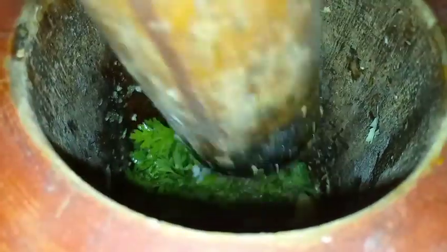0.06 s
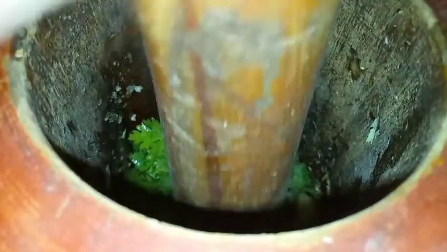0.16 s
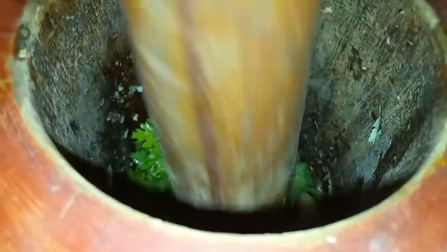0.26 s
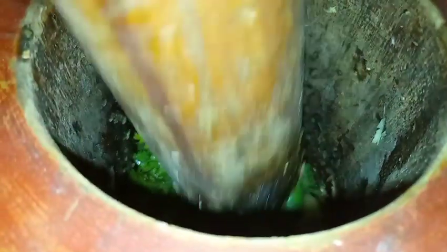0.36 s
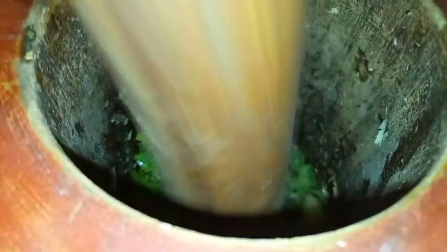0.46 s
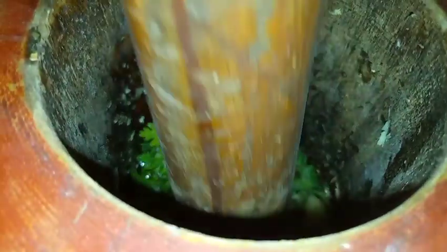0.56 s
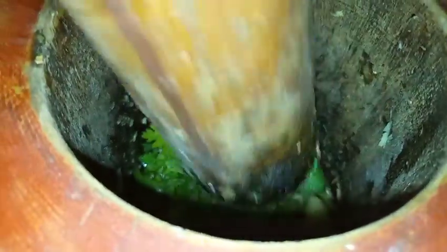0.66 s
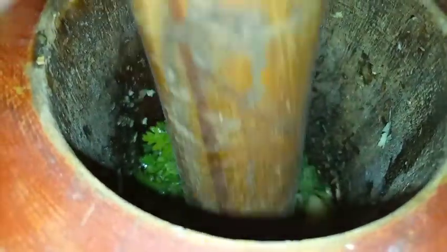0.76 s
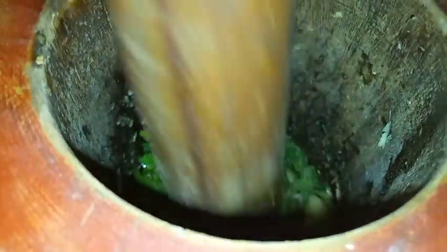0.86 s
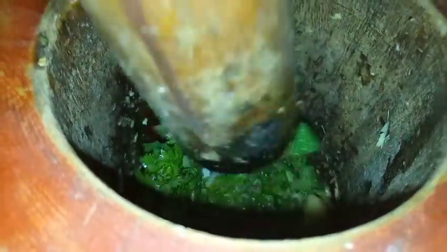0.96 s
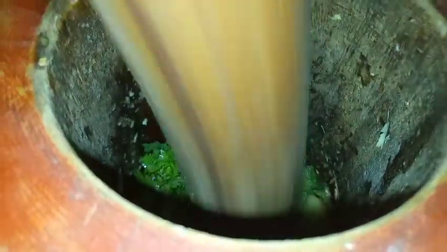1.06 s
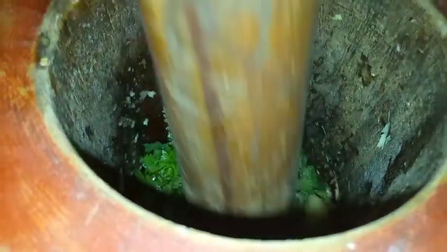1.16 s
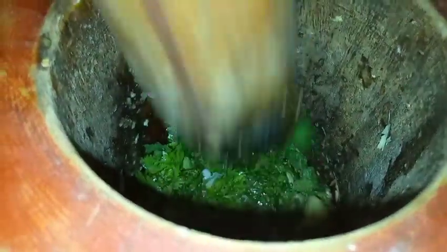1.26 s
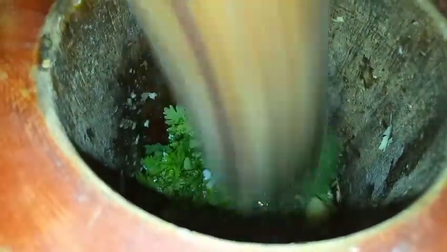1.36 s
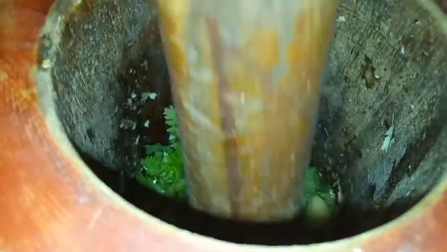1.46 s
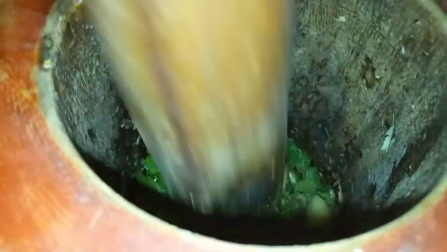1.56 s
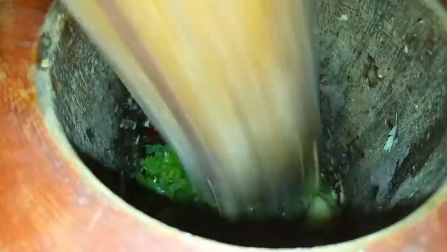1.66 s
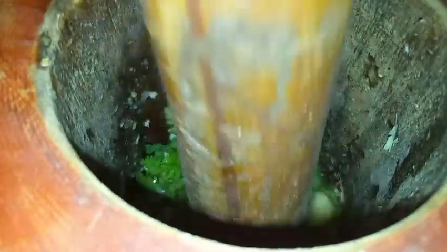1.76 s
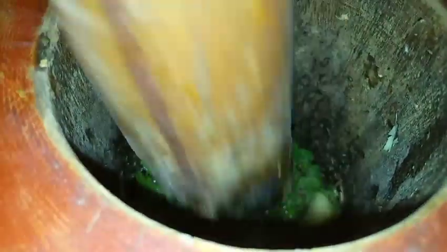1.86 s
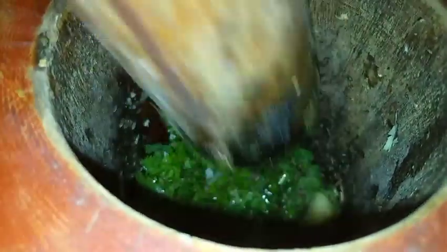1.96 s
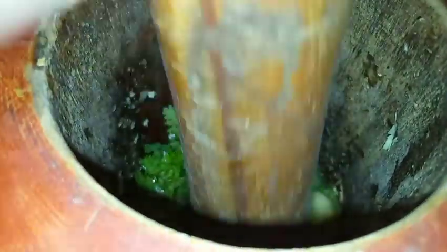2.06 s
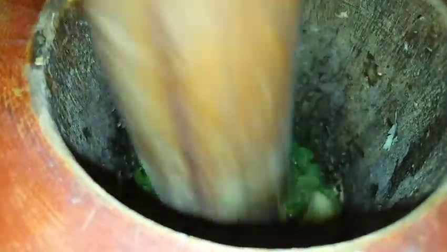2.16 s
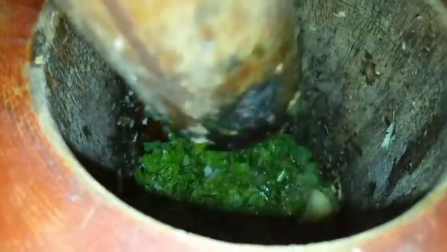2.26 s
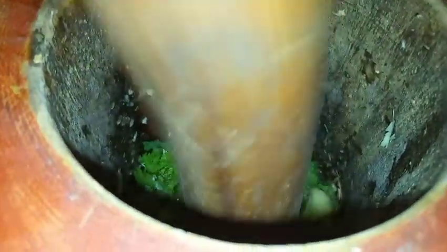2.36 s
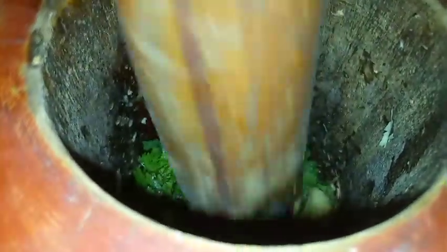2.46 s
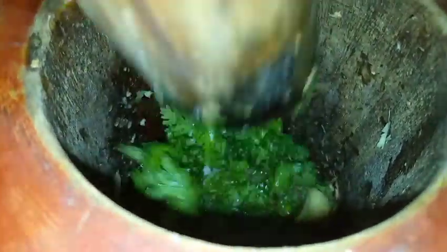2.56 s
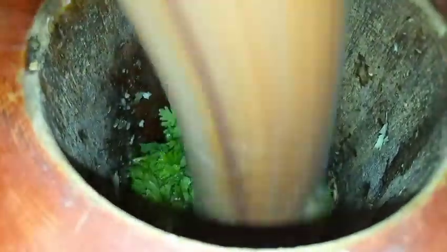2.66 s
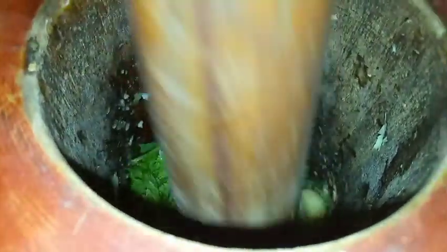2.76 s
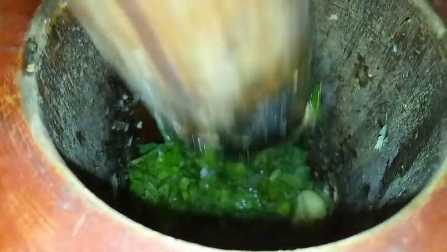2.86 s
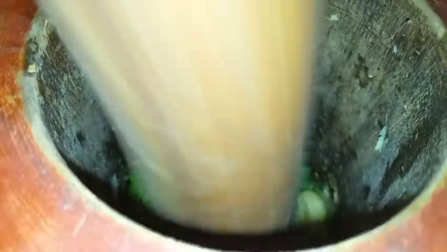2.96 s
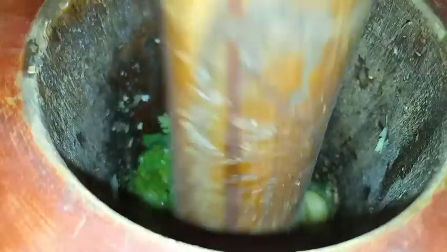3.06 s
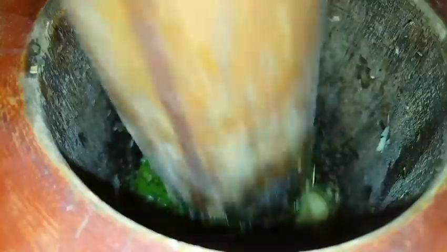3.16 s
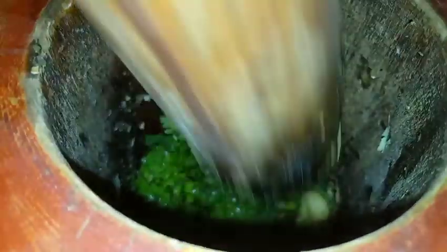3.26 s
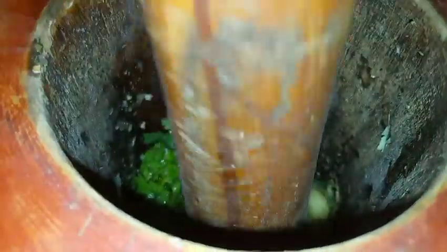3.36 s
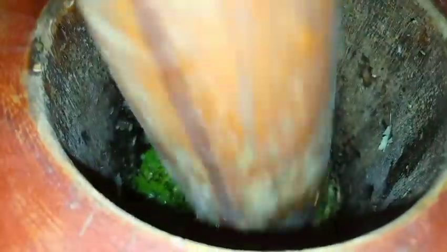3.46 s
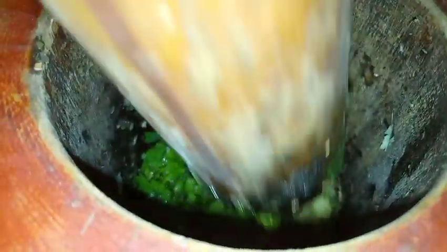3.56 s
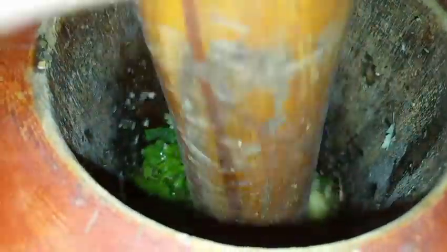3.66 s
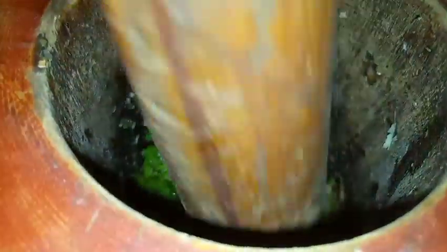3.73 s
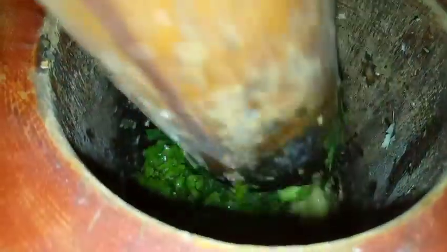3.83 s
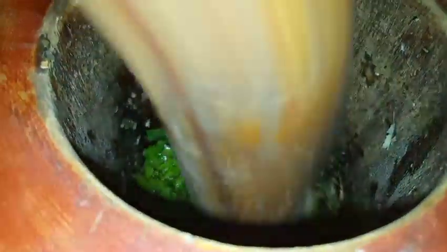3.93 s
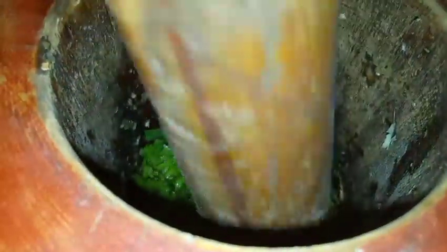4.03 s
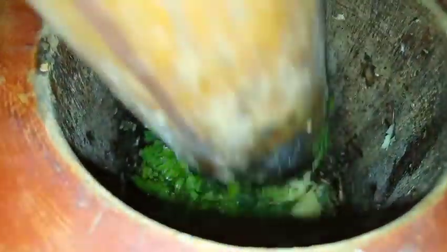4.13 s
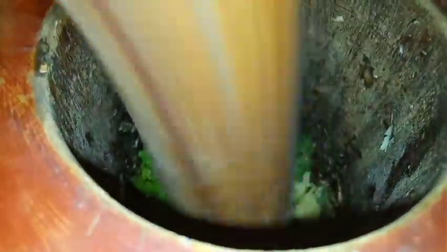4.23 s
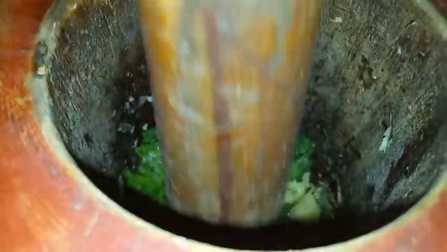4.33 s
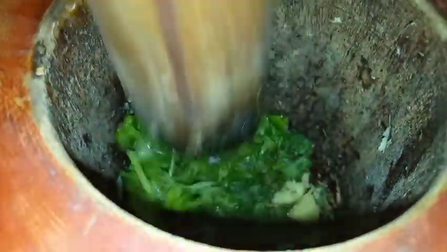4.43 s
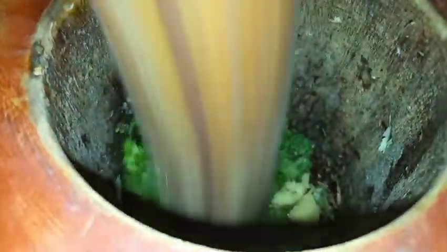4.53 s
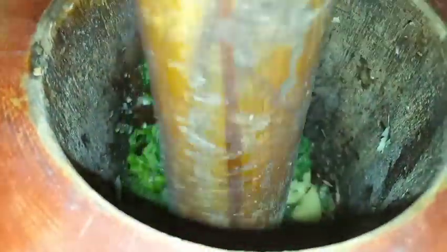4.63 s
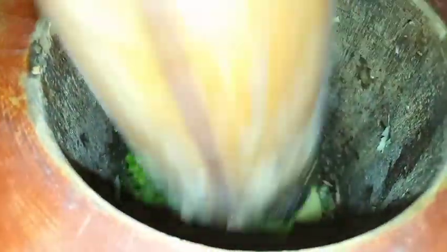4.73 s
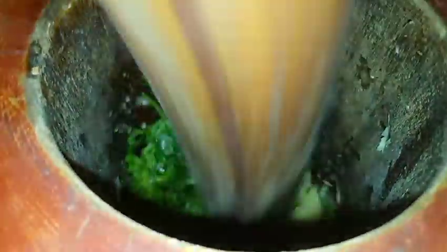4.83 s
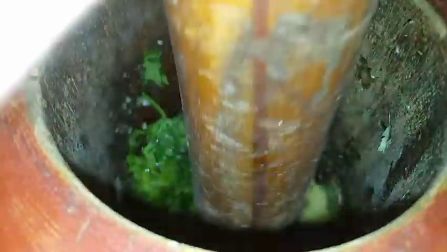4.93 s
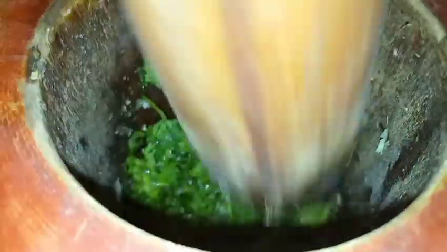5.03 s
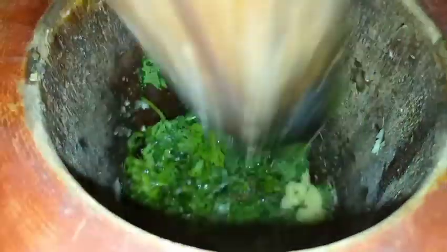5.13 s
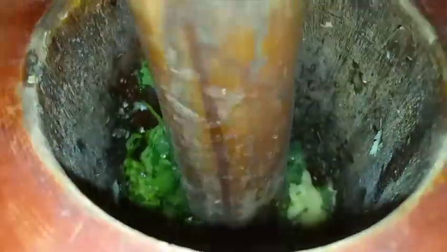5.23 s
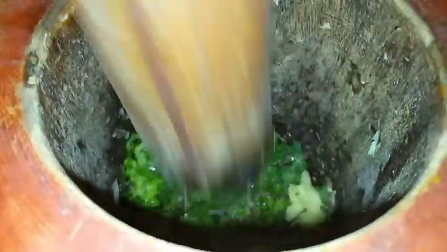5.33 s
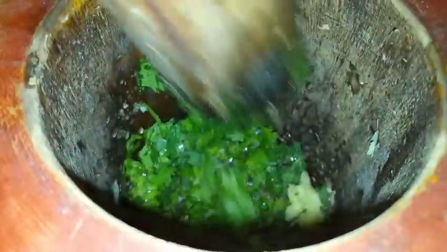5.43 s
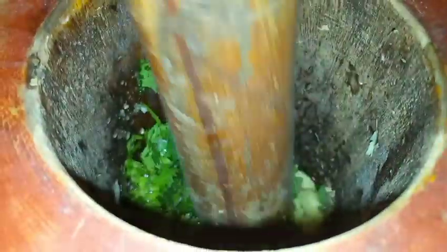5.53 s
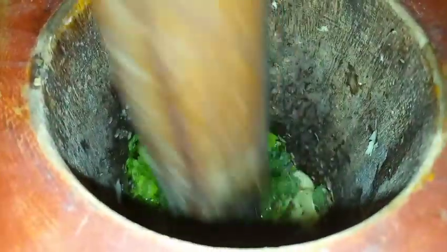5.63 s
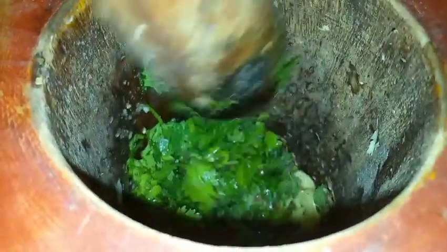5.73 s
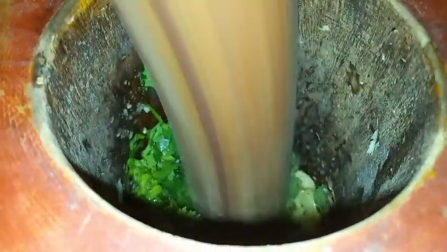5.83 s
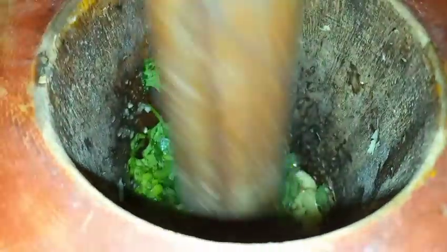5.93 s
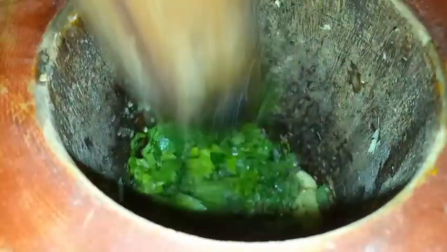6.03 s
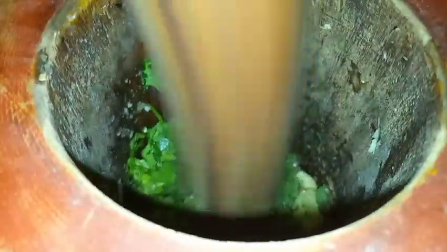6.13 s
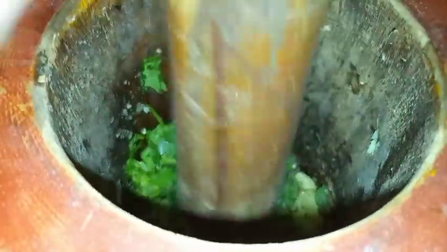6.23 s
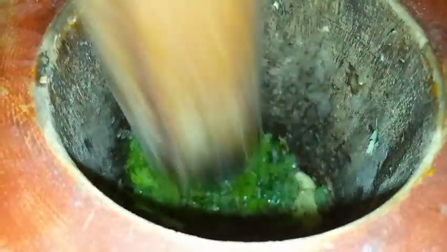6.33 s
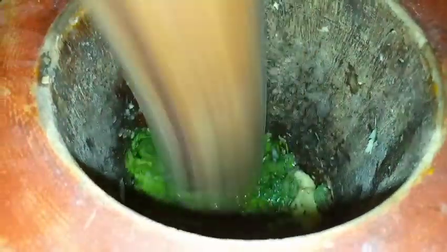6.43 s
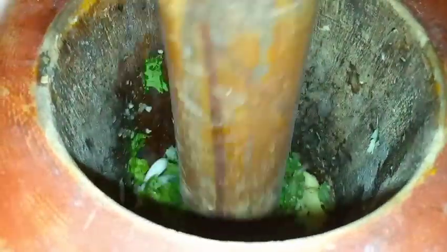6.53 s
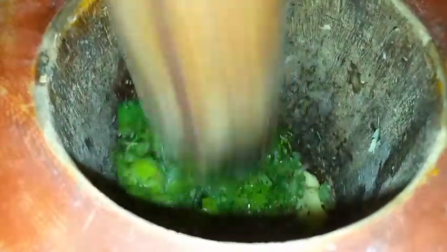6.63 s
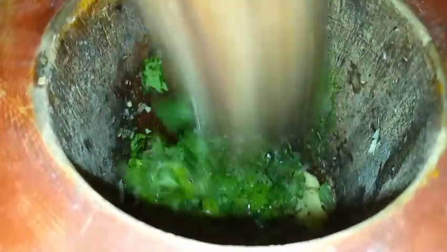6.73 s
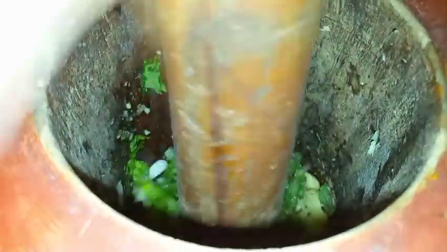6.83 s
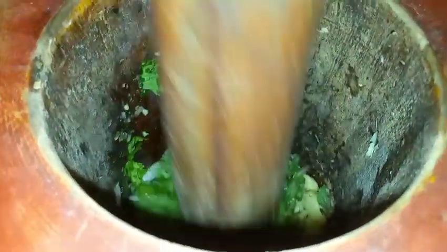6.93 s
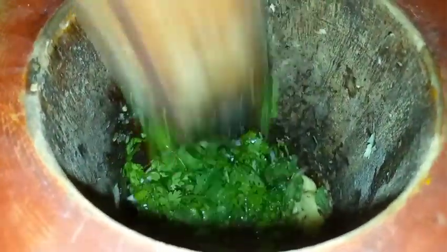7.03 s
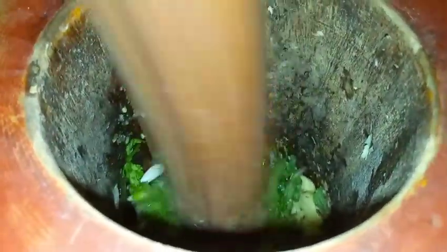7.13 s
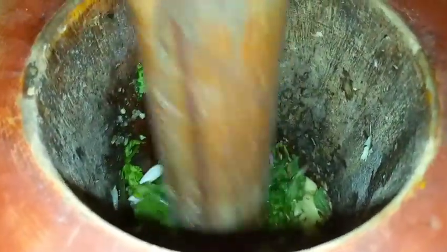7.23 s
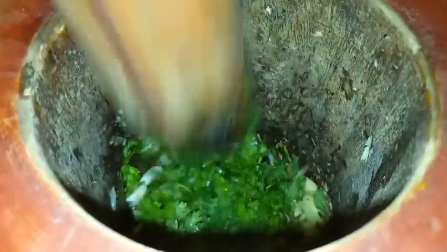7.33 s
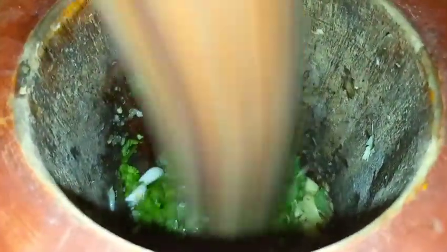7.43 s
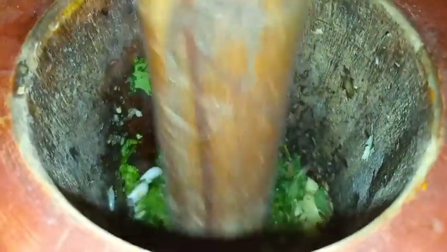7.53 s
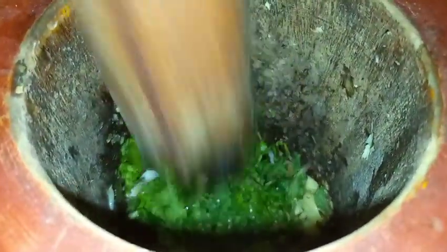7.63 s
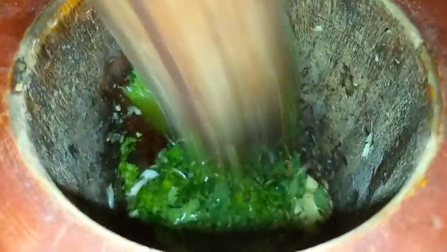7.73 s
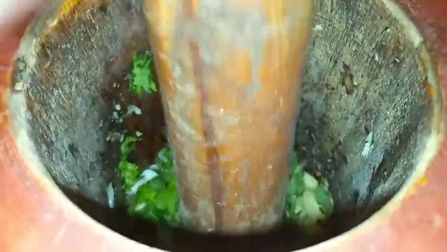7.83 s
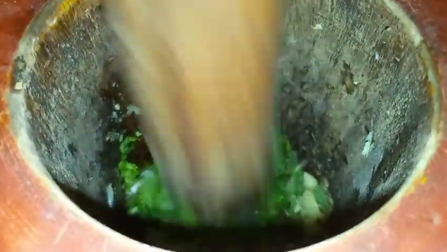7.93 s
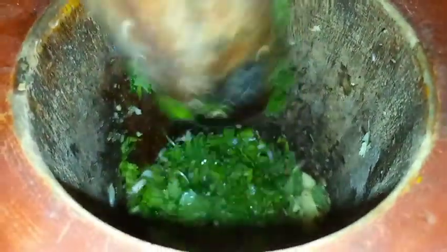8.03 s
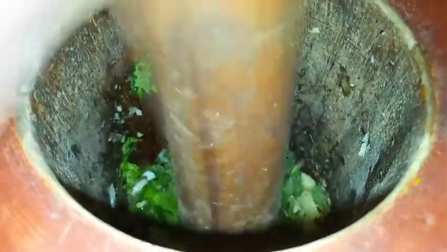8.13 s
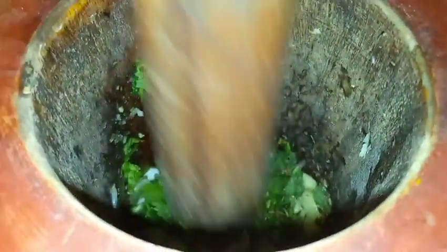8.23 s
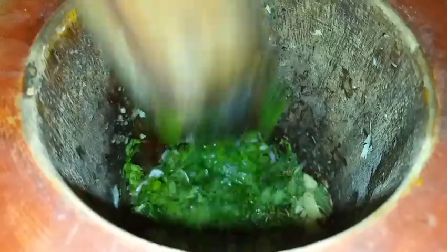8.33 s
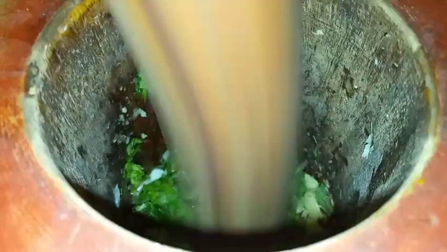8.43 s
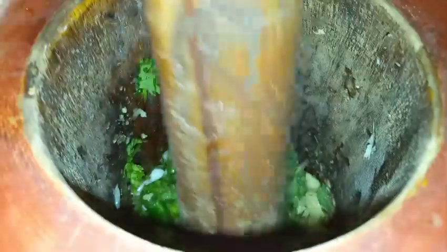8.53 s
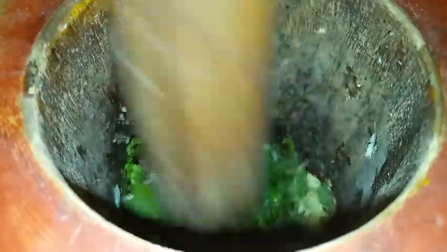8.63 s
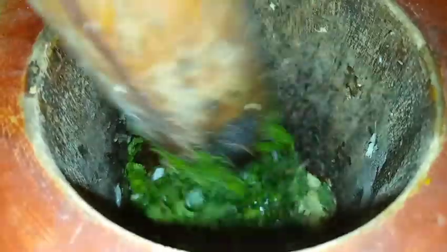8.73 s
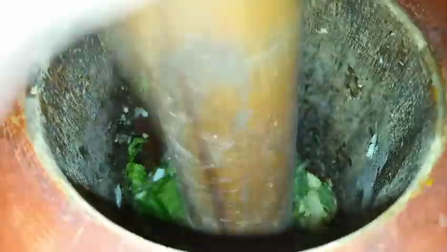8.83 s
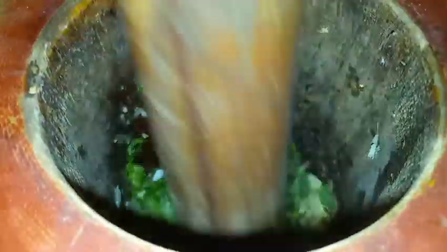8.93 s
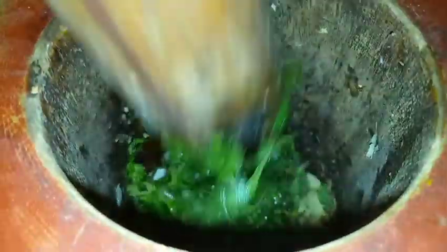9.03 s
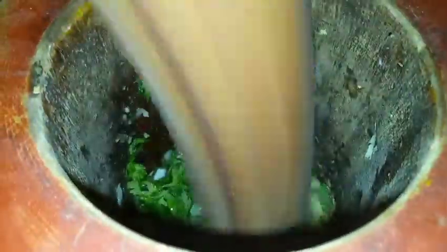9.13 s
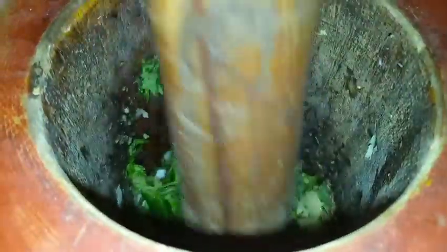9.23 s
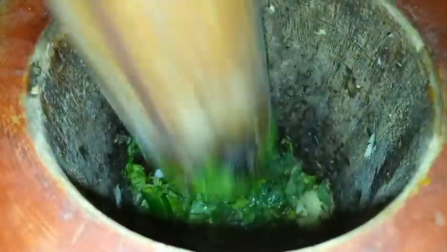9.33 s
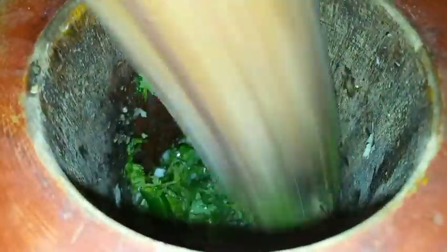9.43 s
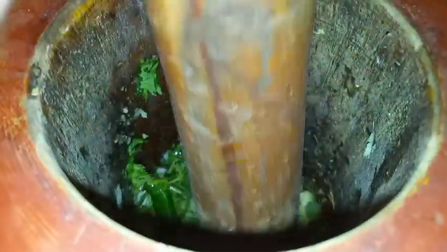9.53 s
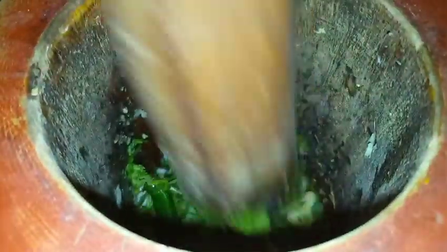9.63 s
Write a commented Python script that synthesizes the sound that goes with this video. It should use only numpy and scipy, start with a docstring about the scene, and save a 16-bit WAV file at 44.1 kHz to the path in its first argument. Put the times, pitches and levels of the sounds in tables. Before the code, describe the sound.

A wooden pestle pounds wet green herbs in a stone mortar about three times a second, each blow a crisp crunch over a low thud.

```python
"""A wooden pestle pounds herbs in a stone mortar about three times a second, in a small hard-walled kitchen.
Each blow sums a crunch (shaped noise), a thud and knock of mortar and worktop (low damped sines),
and a clack of wood on stone (higher damped sines) that weakens with the knock. Glances, taps, rebounds,
wet ticks and faint thin knocks fall around the blows; leaves rustle and a steady hiss fills the room.
One close microphone feeds both channels."""
import sys
import numpy as np
from scipy import signal
from scipy.fft import rfft, irfft, next_fast_len
from scipy.io import wavfile
from scipy.ndimage import uniform_filter1d, map_coordinates

SR = 44100
rng = np.random.default_rng(int(sys.argv[2]) if len(sys.argv) > 2 else 0)


def gain_from_decibels(decibels):
    """Convert decibel values to linear amplitude factors."""
    exponent = np.asarray(decibels, float) / 20
    return 10 ** exponent


def transcribe(signal):
    """Save signal, clipped to [-1, 1], as a 16-bit WAV file at the path in sys.argv[1]."""
    frames = np.atleast_2d(signal).T
    limited = np.clip(frames, -1, 1)
    pcm = np.round(limited * 32767).astype(np.int16)
    wavfile.write(sys.argv[1], SR, pcm)


N = 426888
LEAD = SR // 2  # run-up before time zero, also length of each event, samples

# full blows on the herbs: crunch_peak_s, thud_db, knock_db, crunch_db, tilt_db_per_octave, air_gap_hz
BLOWS = [(-0.113, -32.5, -40, -22.5, 0, 4500), (0.217, -32, -37.5, -24.5, -1, 4580),
         (0.5153, -35.5, -43, -25, -2, 5350), (0.8223, -33.5, -38, -25, -1.8, 4470),
         (1.1473, -35.5, -36.5, -23.5, 0.4, 4750), (1.4623, -32.5, -33, -23, -2, 5040),
         (1.7827, -38, -46.5, -27, -1.5, 3380), (2.1025, -32.5, -36.5, -23.5, -4.5, 3400),
         (2.4309, -33.5, -37, -25.5, -2.5, 4380), (2.7504, -37, -41, -23, -0.5, 3750),
         (3.0541, -44, -50, -24, -.6, 3450), (3.3742, -35, -36.5, -27, -2, 3000),
         (3.6945, -48.5, -46, -20.5, -2.5, 2980), (3.9937, -37, -45.5, -23.5, -4.5, 4600),
         (4.3071, -34.5, -34, -22.5, -4.5, 4660), (4.6241, -46.5, -60.5, -25.5, -1.3, 3000),
         (4.932, -38, -58.5, -25.5, -1.6, 3550), (5.256, -38.5, -52.5, -21.5, -2.2, 4320),
         (5.5755, -34.5, -43, -26, -0.5, 3440), (5.895, -33, -39, -23.5, -0.5, 4460),
         (6.2306, -33, -40.5, -24.5, -1.5, 3160), (6.5435, -43.5, -54.5, -23, -1.5, 5160),
         (6.8722, -32, -31.5, -23.5, -1.2, 3400), (7.2005, -33, -37.5, -24, -1, 3400),
         (7.528, -32.5, -31, -23.5, -1, 2560), (7.86, -33, -33, -23.5, -5.5, 2800),
         (8.199, -33, -33, -24.5, -8, 3500), (8.5359, -32, -29.5, -22, -7.5, 3000),
         (8.8727, -34, -37, -24.5, -2, 2900), (9.2102, -35, -38, -26.5, -3.5, 4000),
         (9.5407, -44, -47, -22.5, -4, 3030)]
# mortar, worktop and room ringing together: mode_hz, relative_db, t60_s
BODY_MODES = [(104, -37, .78), (116.8, -38.5, .89), (123, -41, 1.07), (136.6, -26.5, .32),
              (148.8, -30.5, .54), (158.4, -23, .42), (161.9, -15.5, .15), (167, -38, .6),
              (179.8, -47, .76), (183.8, -36.5, .61), (193.7, -32, .26), (215.2, -50.5, 1.2),
              (226.9, -29, .39), (228.2, -29, .24), (256, -38, .37), (263.5, -41, .81), (269.7, -46.5, .78),
              (274.6, -30.7, .52), (291, -37, .65), (306.7, -47.5, .46), (314, -54.5, 1.1),
              (331.7, -42, .48), (345, -36, .54)]
# first motion of each body mode at the microphone: sign (+1 push, -1 pull)
BODY_SIGNS = [-1, 1, 1, 1, 1, 1, -1, 1, -1, 1, 1, -1, 1, -1, 1, 1, -1, -1, -1, 1, -1, -1, -1]
# colour of crushed leaves: freq_hz, relative_db
CRUNCH_SPECTRUM = [(290, -45.5), (500, -18.5), (952, -30.5), (1980, -14), (3160, -4.5), (4490, -2),
                   (5590, -7), (6280, -1.5), (8670, -28), (10600, -15.5), (12300, -21), (15100, -17),
                   (16500, -48)]
# pestle and mortar wall: mode_hz, relative_db, t60_s
WOOD_MODES = [(343, -11, 0.35), (424.4, 2, 0.096), (472, -6, 0.15), (518.7, -1, 0.24), (555, -2, 0.072),
              (585.4, 3.5, 0.13), (703, -4, 0.02), (795, -6.5, 0.1), (880, 0.5, 0.032), (994, -5, 0.06),
              (1132.6, 1.5, 0.081), (1225, -2.5, 0.062), (1404, -9, 0.046), (1645, -2.5, 0.047),
              (1870, -4.5, 0.038), (2020, -14, 0.035), (2800, 7, 0.095), (3400, -32, 0.032),
              (4140, 14, 0.068)]
# pestle glancing off the wall on its way down: start_s, clack_db, favoured_hz, range_octaves, room_db
GLANCES = [(3.6946, -40, 600, 2.5, -18.5), (3.992, -32.5, 1070, 0.75, -17.5), (4.3064, -37.5, 740, 0.6, -8),
           (8.198, -44, 893, 0.83, 0), (8.5345, -30, 897, 0.69, -10), (9.5399, -51.5, 850, 0.77, -17)]
# light taps on the wall between blows: start_s, clack_db, favoured_hz, push_db, crackle_db
TAPS = [(6.103, -44, 1000, -56, -43), (7.384, -59, 1120, -70, -43), (7.702, -52.5, 1120, -75, -40.5),
        (8.361, -40, 1330, -49, -32)]
# tip settling just after a blow: peak_s, crunch_db
REBOUNDS = [(1.812, -41.2), (3.086, -40), (4.024, -36), (4.656, -44.5), (4.964, -39), (5.288, -39.5),
            (5.602, -37.5), (8.903, -34.5), (9.242, -43.5), (9.571, -35.5)]
# wet ticks and stems snapping: peak_s, crunch_db, spread_ms, tilt_db_per_octave
TICKS = [(3.141, -43, 1.8, 6.5), (3.217, -50, 4.7, -5), (4.496, -43, 1.9, 1.5), (5.088, -62.5, 1.5, 12),
         (6.12, -55, 3, -7), (6.339, -47, 11, -2.5), (6.521, -63, 2, -7), (8.179, -49.5, 5.8, -4)]
# thin knocks, perhaps from across the kitchen: start_s, clack_db, favoured_hz, room_db, thump_db
FAR_KNOCKS = [(5.03, -60, 1550, -33, -85), (5.468, -69, 1000, -24, -68), (5.553, -59, 1820, -6, -62),
              (5.746, -54.5, 1200, -2, -50.5)]
# ringing of the thin knocks: mode_hz, relative_db, t60_s
THIN_MODES = [(265, 3, .1), (445, -2, .1), (1065, -10, 0.065), (1744, -2.5, 0.079), (1960, -3, .05),
              (2430, -5, .06), (2900, -5, .07)]
# room decay: freq_hz, t60_s
KITCHEN_DECAY = [(300, 0.64), (1000, 0.36), (3000, 0.4), (8000, 0.22), (15000, 0.14)]
# level of the steady rustle: time_s, level_db
RUSTLE_LEVELS = [(0, -58), (1.9, -60.5), (3.1, -57), (4.2, -57), (5.2, -64.5), (6.0, -63), (7.0, -57),
                 (7.9, -75), (9.0, -75), (9.68, -67)]
# leaves peeling off the rising pestle: peak_s, level_db
PEELS = [(3.23, -54), (3.59, -56), (4.4, -51.5), (4.53, -62), (4.88, -57), (6.05, -59), (5.64, -46.5),
         (5.77, -54), (7.12, -54.5), (7.58, -52.5), (8.29, -46.5), (8.65, -48.5)]
# colour of the rustle: freq_hz, relative_db
RUSTLE_SPECTRUM = [(290, -44), (600, -26), (1000, -30), (1450, -25), (1950, -14), (2800, 0.5), (3500, -7),
                   (4490, 0.5), (6280, -5.5), (8670, -34), (10600, -15.5), (12300, -32), (15100, -29),
                   (16500, -77)]
# colour of the hiss: freq_hz, relative_db
HISS_SPECTRUM = [(35, -42), (60, -1.5), (137, -3), (276, -22.5), (375, -22.5), (700, -27.5), (1050, -23.5),
                 (1450, -30.5), (1750, -23), (2700, -17), (4430, -16.5), (6450, -19.5), (8540, -37),
                 (15000, -30), (16500, -41)]


def pestle():
    """All strokes of the pestle and the small sounds between them, summed on one track."""
    track = np.zeros(N + 3 * LEAD)
    thud, knock = body()
    blows(track, thud, knock)
    glances(track)
    taps(track, thud + knock)
    rebounds(track)
    ticks(track)
    far_knocks(track, thud + knock)
    return track[LEAD:][:N]


def blows(track, thud, knock):
    """Blows land on one spot, so the low ringing repeats; a thicker bed eats thud and draws out the crunch."""
    solid_thud_db, firm_knock_db = -33, -32.5  # reaches the bottom; meets bare stone
    thud_lead_s, clack_lead_s = .0014, .0007  # before the crunch peak
    firm_clack_db, clack_db_per_knock_db = -35.5, 1.314
    solid_spread_ms, spread_ms_per_db = 1.56, .2
    solid_room_db, room_db_per_db = -12.5, 0.42
    for peak_s, thud_db, knock_db, crunch_db, tilt_db, gap_hz in BLOWS:
        eaten_db = solid_thud_db - thud_db
        padded_db = firm_knock_db - knock_db
        add(track, peak_s - thud_lead_s, gain_from_decibels(thud_db) * thud + gain_from_decibels(knock_db) * knock)
        clack_db = firm_clack_db - clack_db_per_knock_db * padded_db
        strike = clack(centre_hz=610, octaves=0.69, room_db=-14.5)
        add(track, peak_s - clack_lead_s, gain_from_decibels(clack_db) * strike)
        spread_ms = solid_spread_ms + spread_ms_per_db * eaten_db
        room_db = solid_room_db - room_db_per_db * eaten_db
        crunch(track, peak_s, crunch_db, spread_ms, tilt_db, gap_hz, room_db)


def crunch(track, peak_s, db, spread_ms, tilt_db, peak_hz, room_db):
    """Leaves giving way, placed by the peak of the burst."""
    add(track, peak_s - .02, gain_from_decibels(db) * snap(spread_ms / 1000, tilt_db, peak_hz, room_db))


def snap(spread_s, tilt_db, peak_hz, room_db):
    """Leaves give way: a ragged burst swells, peaks at 20 ms and breaks off, then the room answers."""
    t = np.arange(LEAD) / SR - .02
    touch_per_ms, touch_spreads = .02, 3.1  # tip brushes the top leaves first: share of peak, rise time
    swell = np.exp(t / (0.67 * spread_s))
    touch = touch_per_ms * spread_s * 1000 * np.exp(t / (touch_spreads * spread_s))
    fall = 0.56 * np.exp(-t / (1.62 * spread_s)) + 0.033 * np.exp(-t / 0.038)
    shape = np.where(t < 0, swell + touch, fall)
    # the air gap under the pestle sings at its own pitch
    pocket_peak_db, pocket_half_width_hz, pocket_share_in_room = 6.5, 310, .4
    hz = np.geomspace(300, 16500, num=90)
    pocket_db = pocket_peak_db / (1 + ((hz - peak_hz) / pocket_half_width_hz) ** 2)
    colour_db = along(CRUNCH_SPECTRUM, hz) + pocket_db + rng.normal(0, 0.32, len(hz))
    room_colour_db = colour_db - (1 - pocket_share_in_room) * pocket_db
    noise = coloured(rng.standard_normal(LEAD), np.transpose([hz, colour_db]), tilt_db)
    burst = noise * unit(shape * flicker(LEAD, step=60.35, depth_db=3.0))
    echoes = kitchen(delay_s=0.015, patchy_db=2.5)
    tail = np.roll(coloured(echoes, np.transpose([hz, room_colour_db]), tilt_db), SR // 50)
    return (burst + gain_from_decibels(room_db) * tail) * np.sqrt(SR / 40 / LEAD)  # burst energy: rms 1 over 25 ms


def body():
    """Thud and knock: mortar, worktop and room modes below and above 205 Hz; the upper need firm contact."""
    hz, db, t60_s = np.transpose(BODY_MODES)
    split_hz = 205
    thud = ringing(hz, db, t60_s, np.multiply(BODY_SIGNS, hz < split_hz))
    knock = ringing(hz, db, t60_s, np.multiply(BODY_SIGNS, hz > split_hz))
    return thud, knock


def clack(centre_hz, octaves, room_db, modes=WOOD_MODES):
    """Wood on stone: the strike favours some modes; the room keeps their pitch over a wider, blurred wash."""
    hz, db, t60_s = np.transpose(modes)
    favour_db = -6 * (np.log2(hz / centre_hz) / octaves) ** 2
    varied_db = db + favour_db + rng.standard_normal(len(hz))
    ring = ringing(hz, varied_db, t60_s, np.ones(len(hz)))
    echoes = kitchen(delay_s=0.016, patchy_db=3.6)
    pitched = unit(signal.fftconvolve(ring, echoes)[:LEAD])
    wash = coloured(echoes, [(220, -45), *zip(hz, 0.42 * db + 0.42 * favour_db), (7000, -60)])
    return ring + gain_from_decibels(room_db) * (pitched + gain_from_decibels(0.5) * wash)


def ringing(hz, db, t60_s, weights):
    """Damped sines set off together, rms 1 over their first tenth of a second."""
    t = np.arange(LEAD)[:, None] / SR
    modes = np.sin(2 * np.pi * hz * t) * gain_from_decibels(db - 60 * t / t60_s)
    ring = modes @ weights
    return ring / np.std(ring[:SR // 10])


def glances(track):
    """The pestle strikes the wall as it comes down: clacks alone."""
    for start_s, db, centre_hz, octaves, room_db in GLANCES:
        add(track, start_s, gain_from_decibels(db) * clack(centre_hz, octaves, room_db))


def taps(track, push):
    """Light taps on the wall: a clack, a push into the mortar and a crackle peaking 2 ms later."""
    for start_s, db, centre_hz, push_db, crackle_db in TAPS:
        strike = clack(centre_hz, octaves=0.9, room_db=-20)
        add(track, start_s, gain_from_decibels(db) * strike + gain_from_decibels(push_db) * push)
        crunch(track, start_s + .002, crackle_db, spread_ms=2.2, tilt_db=-9.5, peak_hz=2963, room_db=-19)


def rebounds(track):
    """The tip settles once more into the leaves: a dull, slower crunch."""
    for peak_s, db in REBOUNDS:
        crunch(track, peak_s, db, spread_ms=4.3, tilt_db=-6.5, peak_hz=4200, room_db=-10)


def ticks(track):
    """Wet ticks and snapping stems: small crunches of varied length and brightness."""
    for peak_s, db, spread_ms, tilt_db in TICKS:
        crunch(track, peak_s, db, spread_ms, tilt_db, peak_hz=4460, room_db=-7)


def far_knocks(track, thump):
    """Thin knocks: a few short modes, room wash and a low thump."""
    for start_s, db, centre_hz, room_db, thump_db in FAR_KNOCKS:
        strike = clack(centre_hz, octaves=1.8, room_db=room_db, modes=THIN_MODES)
        add(track, start_s, gain_from_decibels(db) * strike + gain_from_decibels(thump_db) * thump)


def kitchen(delay_s, patchy_db):
    """The walls' answer to an impulse, rms 1: each frequency dies at its own speed, in uneven patches."""
    hz, t, z = signal.stft(rng.standard_normal(LEAD), SR, nperseg=256)
    patches = uniform_filter1d(rng.standard_normal(z.shape), size=4, axis=0)
    patches = uniform_filter1d(patches, size=9, axis=1)
    decay_db = -60 * t / along(KITCHEN_DECAY, hz)[:, None]
    gain = gain_from_decibels(patchy_db * unit(patches) + decay_db)
    tail = signal.istft(z * gain, SR, nperseg=256)[1][:LEAD]
    build_up = 1 - np.exp(-np.arange(LEAD) / SR / delay_s)
    return unit(tail * build_up)


def leaves():
    """A fine uneven rustle of filtered noise, swelling whenever leaves peel off the pestle."""
    t = np.arange(N) / SR
    noise = coloured(rng.standard_normal(N), RUSTLE_SPECTRUM)
    rustle = unit(flicker(N, step=870, depth_db=2.5) * noise)
    peels = np.zeros(N)
    for peak_s, db in PEELS:
        width_s = np.where(t < peak_s, .06, 0.095)  # rise, fall
        peels += gain_from_decibels(db) * np.exp(-((t - peak_s) / width_s) ** 2)
    steady = gain_from_decibels(np.interp(t, *np.transpose(RUSTLE_LEVELS)))
    return np.hypot(steady, peels) * rustle


def hiss():
    """Steady coloured noise filling the room."""
    return gain_from_decibels(-56.5) * coloured(rng.standard_normal(N), HISS_SPECTRUM)


def unit(x):
    """Scaled to rms 1."""
    return x / np.sqrt(np.mean(x ** 2) + 1e-20)


def along(points, hz):
    """(Hz, value) points interpolated on a log frequency axis."""
    f, v = np.transpose(points)
    return np.interp(np.log(hz + 1), np.log(f + 1), v)


def coloured(x, spectrum, tilt_db=0):
    """x through the spectrum, leaned by tilt_db an octave about 4 kHz; rms 1."""
    size = next_fast_len(len(x))
    hz = np.fft.rfftfreq(size, 1 / SR)
    gain = gain_from_decibels(along(spectrum, hz) + tilt_db * np.log2(hz / 4000 + .01))  # .01 keeps 0 Hz finite
    return unit(irfft(rfft(x, size) * gain)[:len(x)])


def flicker(count, step, depth_db):
    """A smooth random gain through a new value every step samples."""
    values = rng.standard_normal(int(count / step) + 4)
    return gain_from_decibels(depth_db * map_coordinates(values, [np.arange(count) / step]))


def add(track, start_s, sound):
    """Mix a sound into the track at start_s."""
    track[LEAD + round(start_s * SR):][:len(sound)] += sound


def scene():
    """Pestle, leaves and hiss, the same in both channels."""
    mono = pestle() + leaves() + hiss()
    return np.array([mono, mono])


def roll_off(x):
    """The treble ends steeply here."""
    return signal.sosfilt(signal.butter(12, 16990, fs=SR, output="sos"), x)


def record(dry):
    """The small microphone loses the deep bass and rounds off the tallest peaks."""
    bass_cut_hz, ceiling = 78, .7
    high_pass = signal.butter(2, bass_cut_hz, "high", fs=SR, output="sos")
    thin = signal.sosfilt(high_pass, dry)
    rounded = thin / (1 + abs(thin / ceiling) ** 3) ** (1 / 3)
    return roll_off(rounded)


dry = scene()
out = record(dry)
transcribe(out)
```